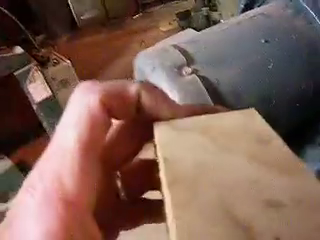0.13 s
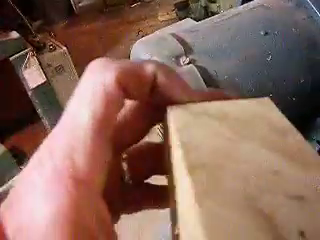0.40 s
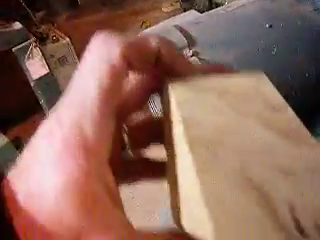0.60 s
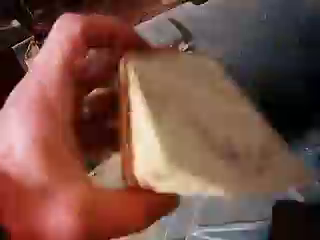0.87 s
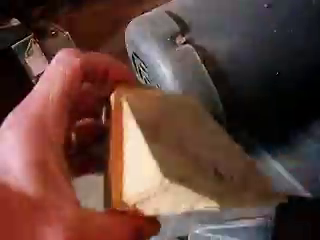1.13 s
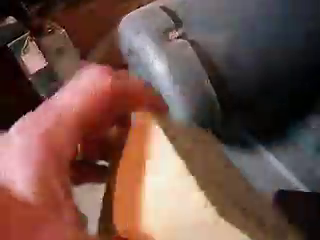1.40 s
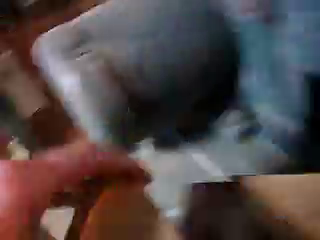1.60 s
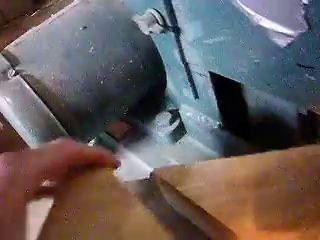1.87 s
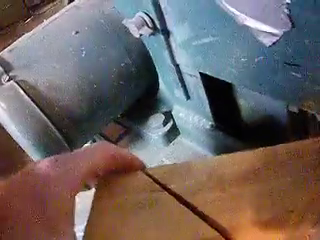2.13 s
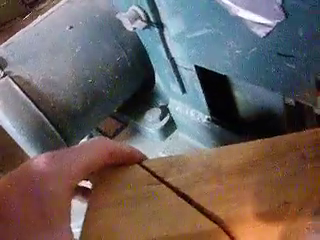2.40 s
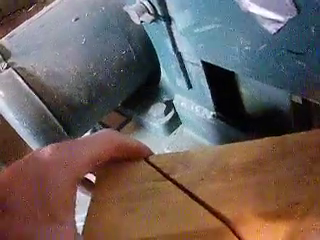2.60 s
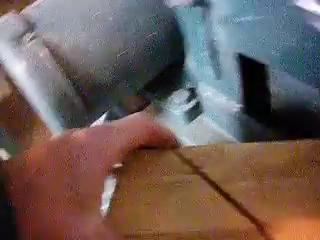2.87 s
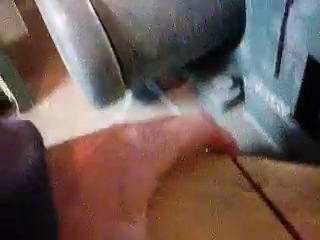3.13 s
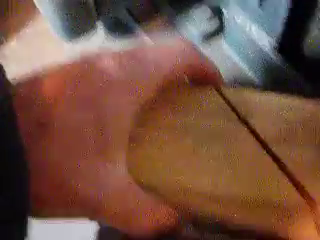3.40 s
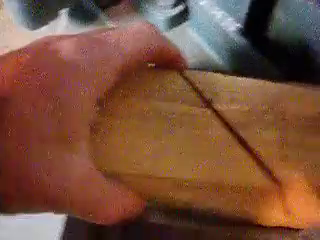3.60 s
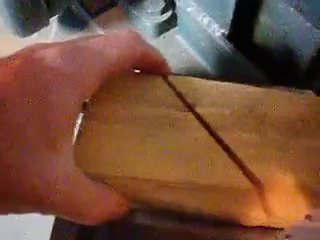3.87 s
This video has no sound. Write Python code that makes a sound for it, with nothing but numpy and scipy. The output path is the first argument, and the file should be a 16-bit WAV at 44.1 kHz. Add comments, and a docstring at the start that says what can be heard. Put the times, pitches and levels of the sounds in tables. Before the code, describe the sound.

Wood blocks knock in a workshop, close to a dull narrow-band microphone. Quiet, steady electric motor hum and airy hiss run throughout. At 1.7 s comes one very loud, dry, slightly clipped knock with a short room tail; faint taps follow at 1.8 and 1.9 s, then a tight triple clatter with bench resonance around 2.1 s. The hum's tone shifts slightly mid-way; a soft dull tap lands at 3.3 s.

```python
"""Wood block knocks beside a workshop motor

Two wood blocks are knocked together close to a small hand-held camera: decaying modes of block and bench, with
a diffuse noise tail for the room. An electric motor hums on steady sines at multiples of the mains, its cooling
air a filtered-noise hiss with casing resonances. The camera leans over mid-way, which shifts the balance of hum
and resonances. Its recorder keeps only a narrow band, and the microphone overloads on the loudest peak."""
import sys
import numpy as np
from scipy import signal
from scipy.io import wavfile

SR = 44100
rng = np.random.default_rng(int(sys.argv[2]) if len(sys.argv) > 2 else 0)


def generate_wav(signal):
    """Clip the signal to [-1, 1] and save it as 16-bit WAV at the path in sys.argv[1]."""
    frames = np.transpose(np.atleast_2d(signal))
    scaled = np.clip(frames, -1, 1) * 32767
    pcm = np.round(scaled).astype(np.int16)
    wavfile.write(sys.argv[1], SR, pcm)


def gain_from_db(level_db):
    """Turn a decibel level (scalar or array-like) into a linear amplitude factor."""
    decades = np.asarray(level_db, float) / 20
    return 10 ** decades


N = 176400  # 4 s


def rms_one(x):
    """Scale to rms 1."""
    return x / np.sqrt(np.mean(x ** 2) + 1e-20)


def at_hz(points, hz):
    """Read a table of (hz, value) on a log-frequency axis."""
    table_hz, values = np.transpose(points)
    return np.interp(np.log(hz), np.log(table_hz), values)


def drift(rate_hz):
    """Slow random wander of spread 1: low-passed noise made at SR / 40, then interpolated."""
    pole = np.exp(-80 * np.pi * rate_hz / SR)
    noise = rng.standard_normal(N // 40 + 2002)
    slow = signal.lfilter([1], [1, -2 * pole, pole * pole], noise)[2000:]  # skip the filter's start
    return np.interp(np.arange(N) / 40, np.arange(len(slow)), rms_one(slow - slow.mean()))


def bands(white):
    """Third-octave slices of two unrelated noises, dealt in turn, with their centres."""
    edges = 20 * 2 ** (np.arange(25) / 3)
    for k, (low, high) in enumerate(zip(edges, edges[1:])):
        band_pass = signal.butter(2, [low, high], "band", fs=SR, output="sos")
        yield np.sqrt(low * high), signal.sosfilt(band_pass, white[k % 2])


def ring(x, hz, t60_s):
    """Two-pole resonator: a unit click sets a decaying sine of starting height 1 ringing."""
    pole = gain_from_db(-60 / (max(t60_s, .002) * SR))
    turn = 2 * np.pi * hz / SR
    return signal.lfilter([0, np.sin(turn)], [1, -2 * pole * np.cos(turn), pole * pole], x)


# modes of the wood block, levels relative to each other: hz, level_db, t60_s
BLOCK_MODES = [(450, 2, 0.0043), (845, -10, 0.0042), (1180, -8, 0.0059), (1490, 7, 0.0038),
               (2180, -6, .007), (2530, -5, .007), (3530, -4, 0.0036)]
MODE_SPREAD_DB = 1.5  # each knock excites the modes a little differently
CONTACT_T60_S = .003


def block_ring(contact_hz, mode_spread_db, length):
    """A short springy contact, itself a decaying sine, sets the block's modes ringing; peak 1."""
    click = np.eye(1, length)[0] + 1e-18
    push = ring(click, contact_hz, CONTACT_T60_S)
    block = np.zeros(length)
    for k, (hz, mode_db, t60_s) in enumerate(BLOCK_MODES):
        sign = (-1) ** (k + 1)  # neighbouring modes start in opposite directions
        block += sign * gain_from_db(mode_db + mode_spread_db[k]) * ring(push, hz, t60_s)
    return block / np.abs(block).max()


# modes of the bench under the blocks: hz, level_db, t60_s
BENCH_MODES = [(165, -30.5, 0.19), (350, -28.5, 0.089), (406, -12.5, .09), (494, -21, 0.15),
               (588, -15.5, 0.14), (745, -24.5, 0.091), (914, -18, 0.17), (1094, -16.5, 0.1),
               (1180, -20.5, .06)]
BENCH_RATTLE_S = 0.011  # the rattle is strongest at half this time


def bench_rattle(length):
    """A burst of noise that swells and dies shakes the bench's modes."""
    t = np.arange(length) / SR
    rattle = rng.standard_normal(length) * t * np.exp(-2 * t / BENCH_RATTLE_S)
    rattle /= np.sqrt(np.sum(rattle ** 2))
    return sum(gain_from_db(mode_db) * ring(rattle, hz, t60_s) for hz, mode_db, t60_s in BENCH_MODES)


# decay of the workshop: hz, t60_s
ROOM_T60 = [(150, 0.3), (400, 0.93), (900, 0.94), (1600, 0.33), (2500, 0.54), (4000, 0.3)]
ROOM_ONSET_S, ROOM_BUILD_S, ROOM_DULL_HZ = .003, 0.0064, 2700


def workshop(length):
    """Diffuse room response of unit energy: noise that builds up, then dies band by band."""
    t = np.arange(length) / SR
    white = rng.standard_normal((2, length))
    tail = sum(band * gain_from_db(-60 * t / at_hz(ROOM_T60, hz)) for hz, band in bands(white))
    tail = signal.lfilter(*signal.butter(1, ROOM_DULL_HZ, fs=SR), tail)
    tail *= 1 - np.exp(-np.maximum(t - ROOM_ONSET_S, 0) / ROOM_BUILD_S)
    return tail / np.sqrt(np.sum(tail ** 2))


# knocks of block on block; level_db is the block's own peak before the low cut, the last two are
# relative to it (room_db adds to ROOM_DB): start_s, level_db, contact_hz, bench_db, room_db
KNOCKS = [(1.6824, -1.3, 1600, -9, 0), (1.8215, -27, 1400, -8, -5.0), (1.934, -33, 1500, -10, -8),
          (2.0633, -11.5, 2000, 2.0, -4.0), (2.0893, -14, 1600, 0.0, -3.0), (2.1050, -19, 1700, -2.0, -3.0),
          (3.2806, -24, 600, -9, -14)]
ROOM_DB, BENCH_IN_ROOM_DB = -12.5, -7.5
KNOCK_LOW_CUT_HZ = 190


def knocks():
    """Each contact rings the block at once, rattles the bench a little longer, and the room answers."""
    out = np.zeros(N + SR)
    length = SR // 2
    spread = rng.normal(0, MODE_SPREAD_DB, (len(KNOCKS), len(BLOCK_MODES)))
    low_cut = signal.butter(3, KNOCK_LOW_CUT_HZ, "high", fs=SR, output="sos")
    for (start_s, level_db, contact_hz, bench_db, room_db), mode_spread_db in zip(KNOCKS, spread):
        block = block_ring(contact_hz, mode_spread_db, length)
        bench = gain_from_db(bench_db) * bench_rattle(length)
        into_room = block + gain_from_db(BENCH_IN_ROOM_DB) * bench
        room = signal.fftconvolve(into_room, workshop(length))[:length]
        mix = block + bench + gain_from_db(ROOM_DB + room_db) * room
        start = int(start_s * SR)
        out[start:start + length] += gain_from_db(level_db) * signal.sosfilt(low_cut, mix)
    return out[:N]


# hum partials, rms level and its change at full lean: mains_multiple, level_db, lean_change_db
HUM = [(2, -65.5, -0.5), (3, -79, 14.5), (4, -40, 2.0), (5, -53.5, -5), (6, -52.5, 1), (7, -69, 15.5),
       (8, -54, 2), (10, -43.5, -7), (12, -63, -4.5), (14, -64, 4), (18, -65, 9), (20, -66.5, 9.5)]
MAINS_HZ = 60.089
HUM_WAVER_DB = 0.4  # for each 10 dB a partial lies below -30 dB


def motor_hum(lean):
    """Magnetic pull shakes the frame at steady multiples of the mains; weaker partials waver more."""
    mains_phase = 2 * np.pi * MAINS_HZ * np.arange(N) / SR
    hum = np.zeros(N)
    for multiple, level_db, lean_change_db in HUM:
        waver_db = HUM_WAVER_DB * drift(4.9) * (-30 - level_db) / 10
        rms = gain_from_db(level_db + lean_change_db * lean + waver_db)
        hum += np.sqrt(2) * rms * np.sin(round(multiple) * mains_phase + rng.uniform(0, 2 * np.pi))
    return hum


# spectrum of the broad hiss, relative: hz, level_db
AIR = [(25, -23.5), (55, -24), (100, -22), (170, -14.5), (280, -11.5), (450, -14), (650, -14.5),
       (1000, -11.5), (1500, -14.5), (1900, -15), (2700, -8.5), (3600, -10.5), (4500, -9)]
AIR_DB, AIR_PATCHY_DB = -43, -0.86  # rms of the broad hiss; depth of its wander


def cooling_air():
    """Broad hiss, slightly patchy: third-octave noises wander partly together, partly alone."""
    together = drift(0.96)
    hiss = np.zeros(N)
    for hz, band in bands(rng.standard_normal((2, N))):
        patchy_db = AIR_PATCHY_DB * (0.27 * together + drift(24.0))
        hiss += gain_from_db(at_hz(AIR, hz) + patchy_db) * band
    return gain_from_db(AIR_DB) * rms_one(hiss)


# casing resonances, rms level and its change at full lean: pitch_hz, width_hz, level_db, lean_change_db
CASING = [(325.5, 30, -62.5, 0.0), (454, 180, -59.5, -0.5), (542, 30, -64.5, -10.5), (1353, 220, -59, 1.5),
          (1597, 350, -53, -3.5), (1974, 350, -53.5, 1), (2230, 120, -56, 1), (2584, 79, -54.5, -12.5),
          (2777, 170, -54.5, 3), (3260, 450, -63, 9.5), (3360, 62, -65.5, -14.5), (3522, 49, -57.5, -6),
          (3730, 120, -59.5, 3)]


def casing_resonances(lean):
    """The casing's resonances stand out of the hiss: noise through two equal resonators in a row."""
    out = np.zeros(N)
    for hz, width_hz, level_db, lean_change_db in CASING:
        t60_s = np.log(1000) / (np.pi * width_hz)  # width of each resonator
        noise = ring(ring(rng.standard_normal(N), hz, t60_s), hz, t60_s)
        wander_db = 1.0 * drift(1.7)
        out += gain_from_db(level_db + lean_change_db * lean + wander_db) * rms_one(noise)
    return out


# the hand-held camera leaning over the bench, 1 is full lean: time_s, lean
LEAN = [(0, 0.13), (.5, 0.09), (1.2, 0), (1.602, 0.0), (1.802, 1), (2.301, 0.73), (2.802, 0.77),
        (3.099, 0.18), (3.3, -.1), (3.6, 0.15), (4, 0.11)]


def camera_lean():
    """How far the camera leans at each sample, in straight lines between the points."""
    return np.interp(np.arange(N) / SR, *np.transpose(LEAN))


def scene():
    """Knocks, hum and hiss on one channel."""
    lean = camera_lean()
    return (knocks() + motor_hum(lean) + cooling_air() + casing_resonances(lean))[None]


def roll_off(x):
    """The treble ends steeply here."""
    return signal.sosfilt(signal.butter(12, 16500, fs=SR, output="sos"), x)


# top edge of the recorder's narrow band: hz, level_db
RECORDER_TOP = [(3700, 0), (3850, -7), (4000, -9), (4200, -16), (4350, -21), (4500, -37), (4600, -58),
                (4660, -100)]
OVERLOAD, OFFSET = .71, -.0028  # of full scale


def record(dry):
    """The recorder's narrow band and a small offset; clipping after the band filter splashes over the whole
    band."""
    hz, db = np.transpose([(0, 0)] + list(RECORDER_TOP) + [(SR / 2, -120)])
    band_limit = signal.firwin2(1501, hz, gain_from_db(db), fs=SR, window=("kaiser", 8))
    narrow = signal.fftconvolve(dry, band_limit[None], "same")
    mix = np.clip(narrow + OFFSET, -OVERLOAD, OVERLOAD)
    return roll_off(mix)


dry = scene()
out = record(dry)
generate_wav(out)
```